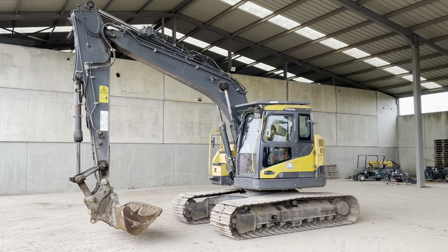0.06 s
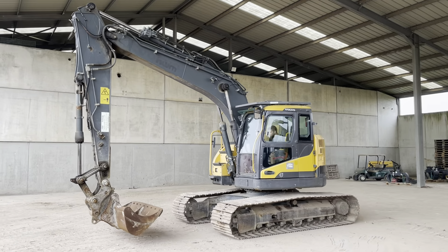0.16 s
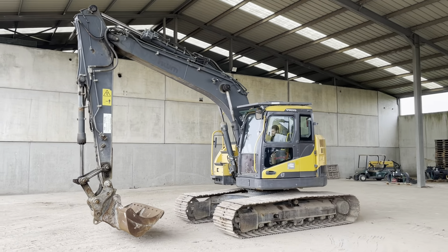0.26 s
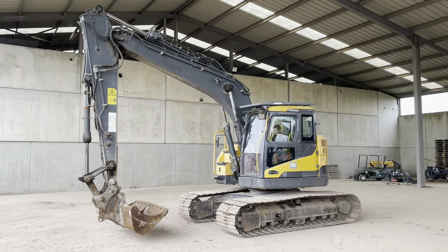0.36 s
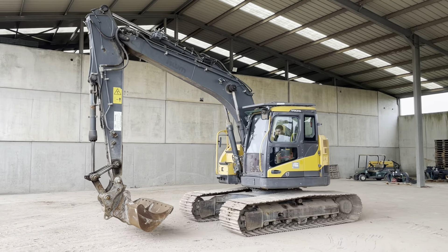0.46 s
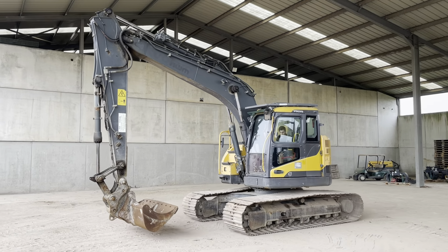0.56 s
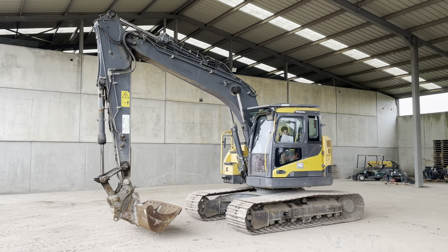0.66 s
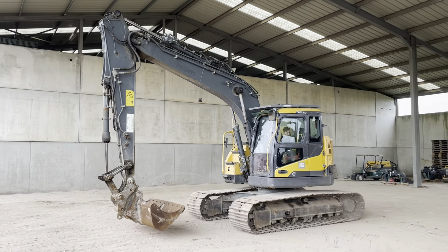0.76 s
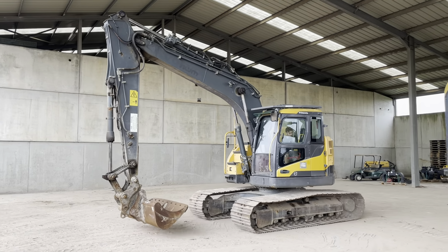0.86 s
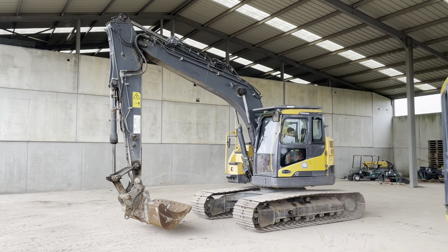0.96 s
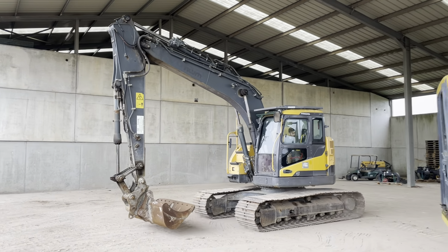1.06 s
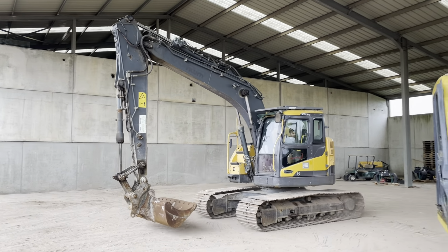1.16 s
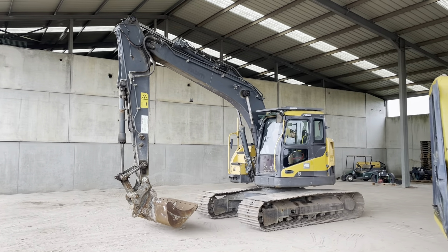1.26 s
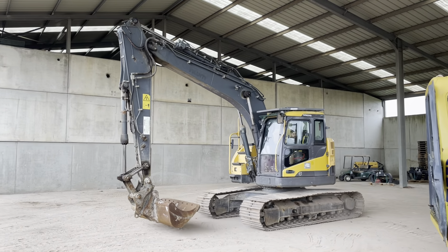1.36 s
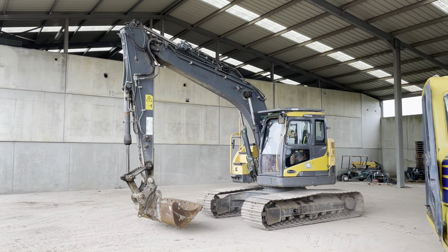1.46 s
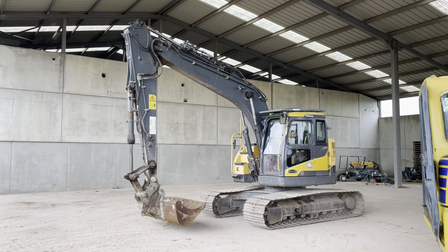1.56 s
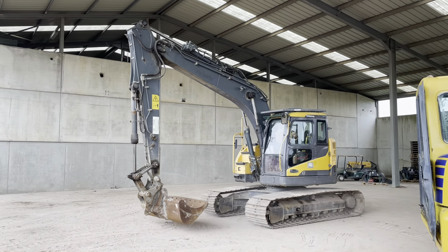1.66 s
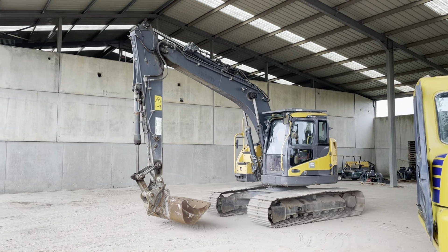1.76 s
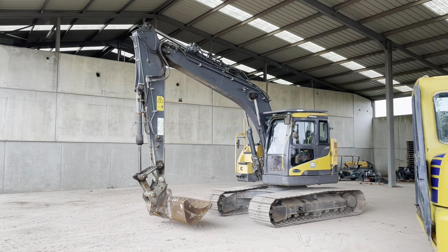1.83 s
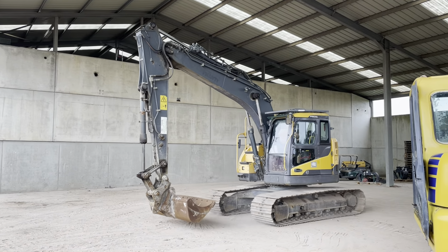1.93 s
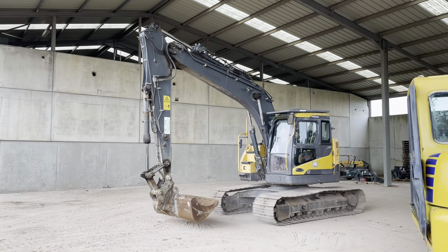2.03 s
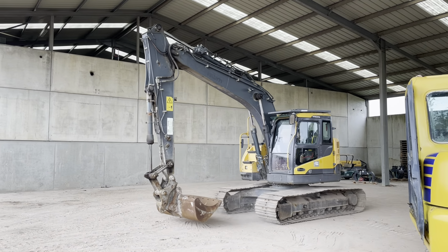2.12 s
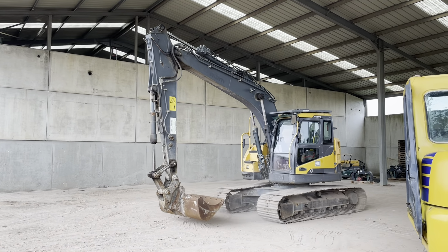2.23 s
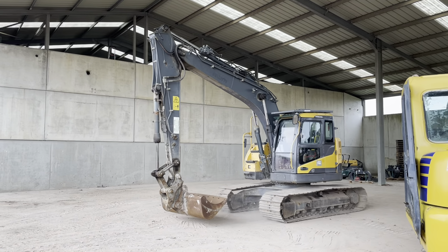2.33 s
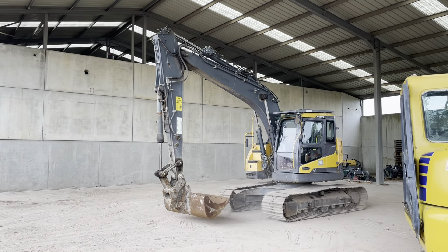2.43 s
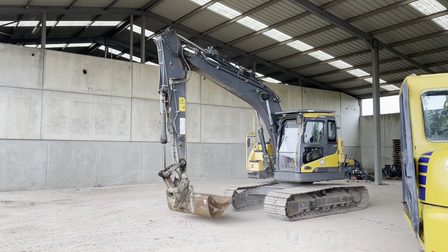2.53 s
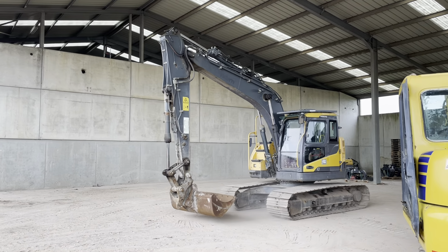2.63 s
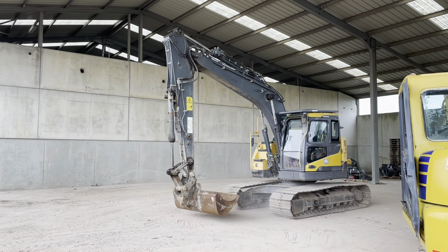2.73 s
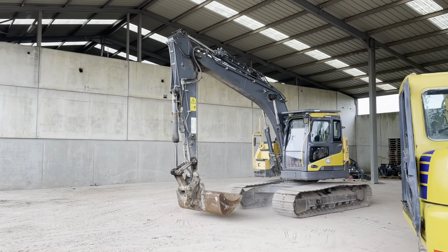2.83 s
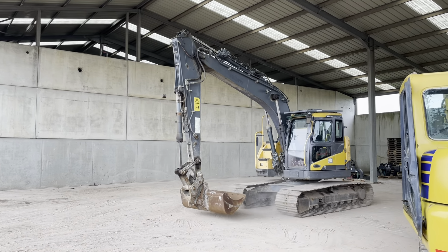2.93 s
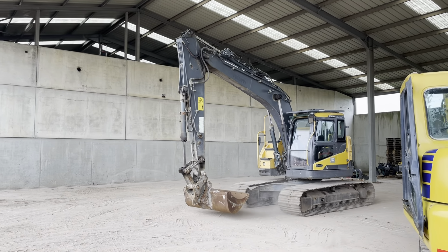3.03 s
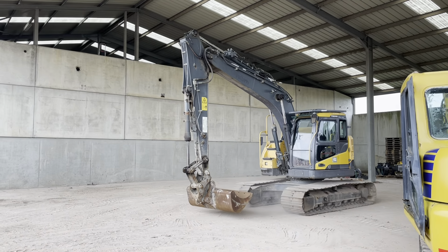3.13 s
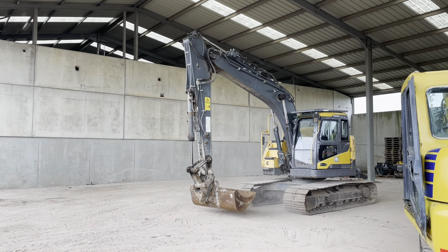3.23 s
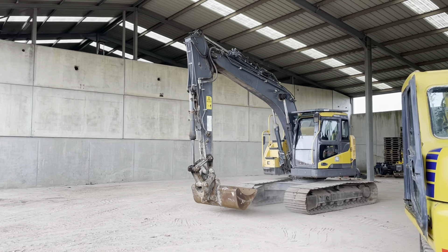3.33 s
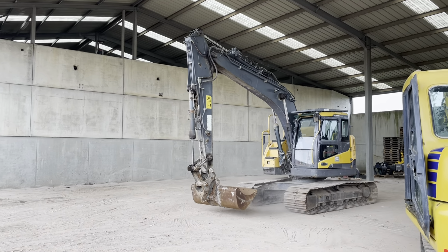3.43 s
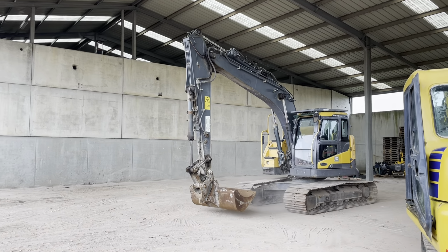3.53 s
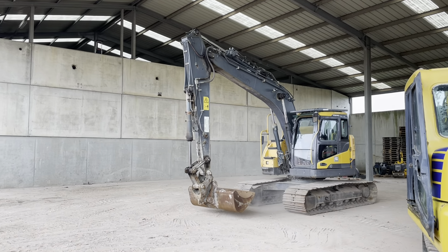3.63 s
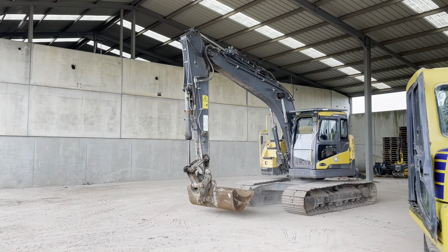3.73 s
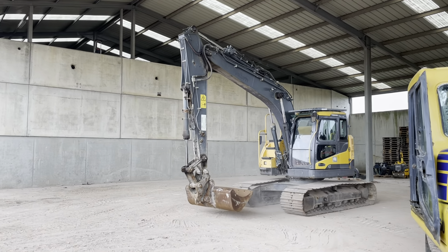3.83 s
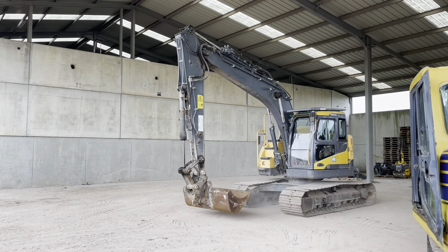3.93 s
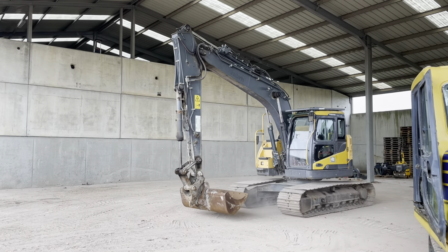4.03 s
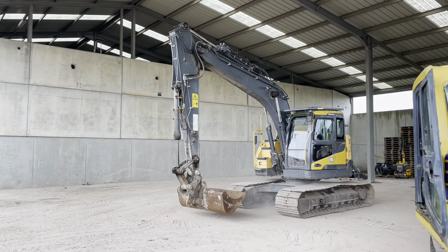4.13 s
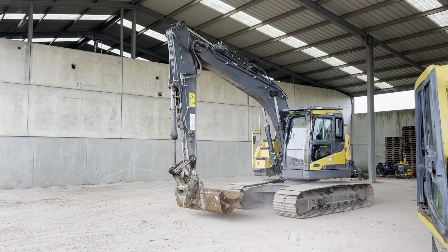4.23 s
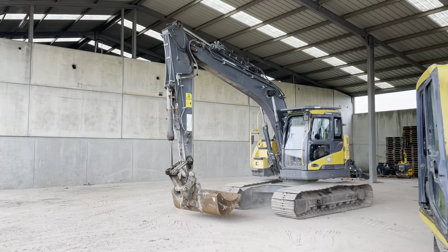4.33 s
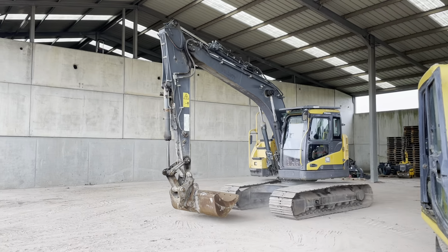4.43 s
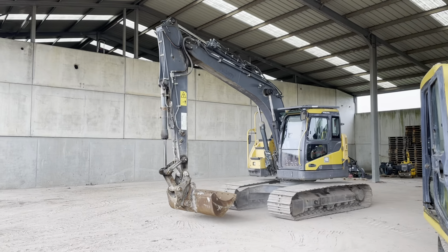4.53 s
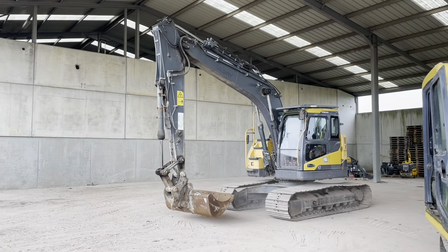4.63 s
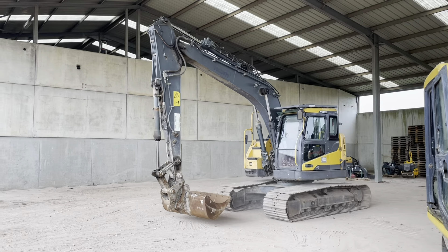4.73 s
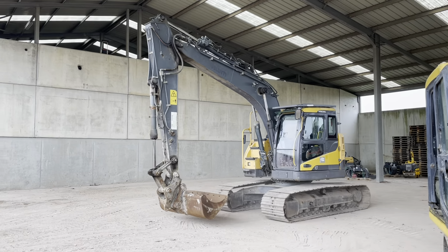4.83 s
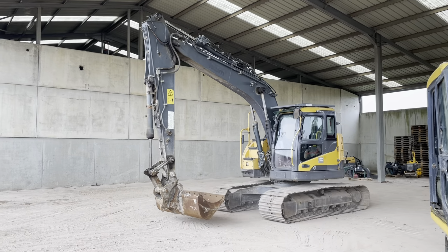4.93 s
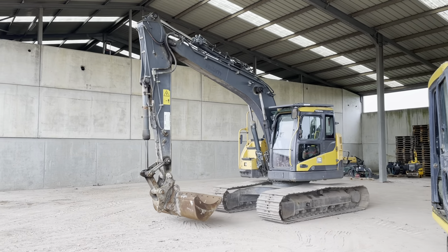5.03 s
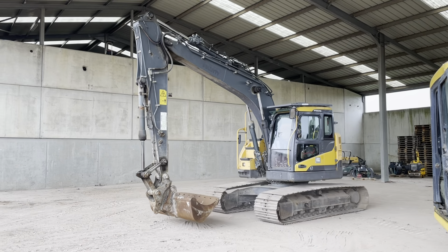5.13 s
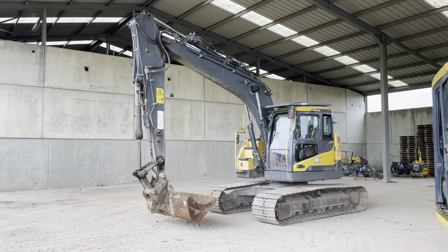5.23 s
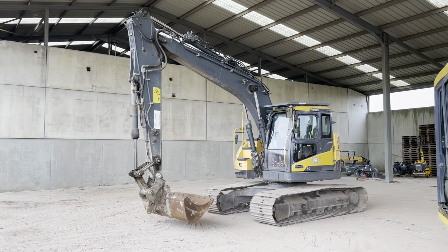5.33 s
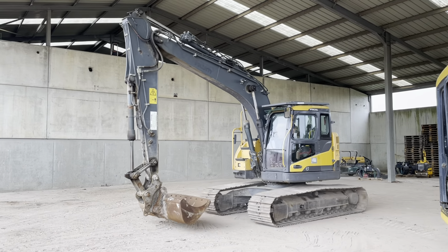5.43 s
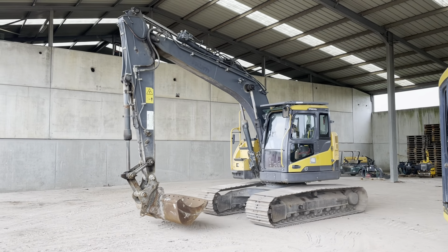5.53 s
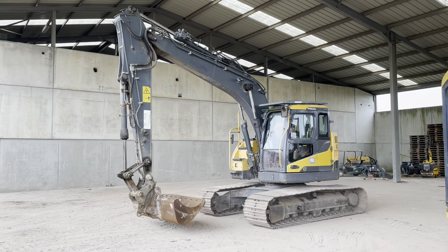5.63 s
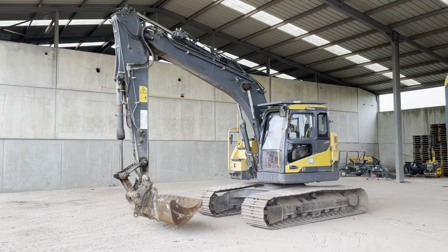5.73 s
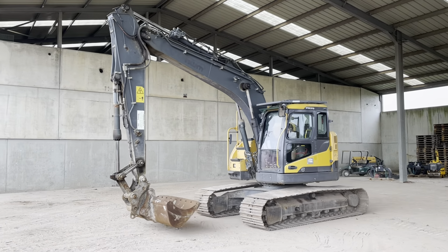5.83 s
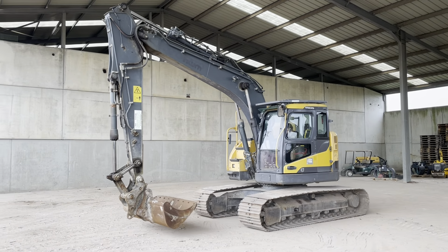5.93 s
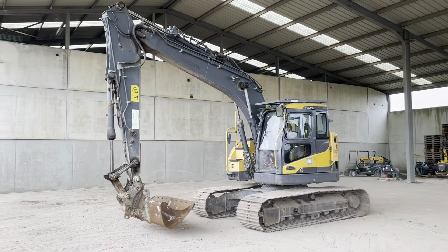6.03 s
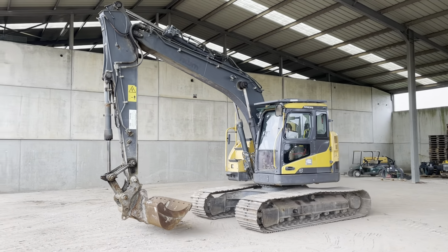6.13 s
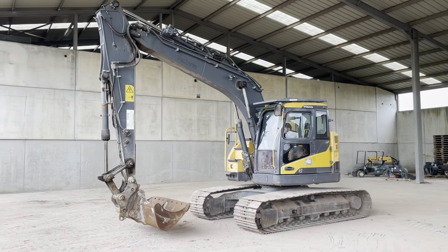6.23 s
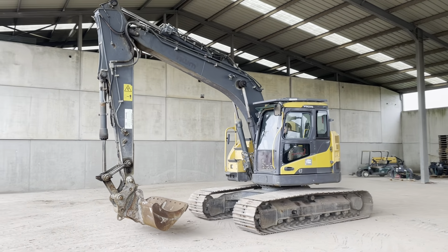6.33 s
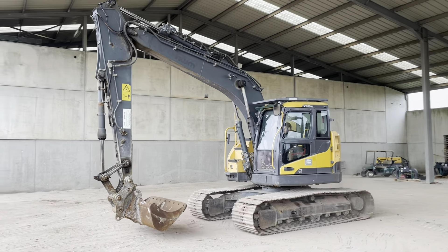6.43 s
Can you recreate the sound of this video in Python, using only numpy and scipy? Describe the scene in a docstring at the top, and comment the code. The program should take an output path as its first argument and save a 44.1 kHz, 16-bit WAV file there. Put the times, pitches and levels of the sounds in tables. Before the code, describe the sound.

Inside a large, bright-ringing shed, an excavator rolls on steel tracks. A steady low diesel and droning travel motors lie under dense metallic clatter, dull shoe slaps, crackling sand and short high pin squeals. Past the middle the clatter sinks almost away, leaving the engine and thin fading squeaks, then returns with a higher motor drone and more squeals. Close stereo microphones, squeals slightly left.

```python
"""In a large shed with a dusty concrete floor a tracked excavator rolls along, slows almost to a halt and moves off again.
The diesel runs steadily as crank tones and pulsing noise; travel motors drone, and the frame booms and groans as noisy notes.
Steel shoes clatter and slap as struck bursts rung through their modes; sand and stones crack as random grains.
Dry track pins squeal as fluttering tones, and decaying noise tails make the shed ring on.
Left and right are two close microphone ports, alike in the bass and the high treble, least alike near 3 kHz."""
import sys
import numpy as np
from scipy import signal
from scipy.fft import rfft, irfft, next_fast_len
from scipy.io import wavfile
from scipy.ndimage import map_coordinates

SR = 44100
rng = np.random.default_rng(int(sys.argv[2]) if len(sys.argv) > 2 else 0)


def wav_out(sig):
    """Save sig, one row per channel (or a flat mono array), as 16-bit PCM at SR to the path in sys.argv[1]."""
    wavfile.write(sys.argv[1], SR, np.round(np.clip(np.atleast_2d(sig).T, -1, 1) * 32767).astype(np.int16))


N = 285327

# The shed's decay: [f/Hz, t60/s]
SHED_DECAY = [(100, 0.44), (1000, 1.8), (2800, 1.5), (5000, 1.37), (11000, 0.79)]
# Likeness of the two ports: [f/Hz, left-right correlation]
PORT_LIKENESS = [(40, .995), (100, .985), (180, .965), (350, .92), (700, .8), (1400, .6), (2800, .3),
                 (4500, .42), (6500, .65), (8000, .92), (14000, .93)]
# Phase between the ports: [f/Hz, lead of left over right/rad]
PORT_LEAD = [(5500, 0), (6630, -.9), (7670, -2.7), (8870, -3.5), (10800, -5.9), (12800, -6.8),
             (13900, -9.4)]
# How hard the tracks run, 0 dB = full travel: [t/s, level/dB]
TRACK_EFFORT = [(0, -3), (.27, -10), (.75, -2.5), (1.55, -0.5), (1.8, -0.5), (2.55, 0.65), (2.9, -0.6),
                (3.17, -0.5), (3.36, -2.5), (3.52, -9.5), (3.78, -16), (4.22, -2.5), (4.5, -0.5), (4.63, 3),
                (4.95, 2), (5.3, 0), (5.8, 1.5), (6.47, -2.6)]
# The diesel's low tones: [multiple of crank speed, level/dB]
CRANK_ORDERS = [(1, -71), (2, -35.5), (3, -45.5), (4, -38.5), (9, -47), (21, -46)]
# Fan and block noise, relative spectrum: [f/Hz, level/dB per Hz]
BLOCK_SPECTRUM = [(20, -36), (45, 4), (70, 5), (125, -25), (190, -9.5), (300, 0.5), (500, -6.5),
                  (900, -8.5), (1400, -10), (2000, -13.5), (4000, -21), (8000, -38.5)]
# The travel motors, faster after the halt: [t/s, f/Hz]
MOTOR_PITCH = [(0.4, 171), (3.6, 172.8), (4.3, 196.5), (6.47, 205)]
# The motors strain as the machine pulls away: [start t/s, length/s, level/dB]
MOTOR_STRAINS = [(.4, 0.35, -28)]
# The machine's weight rocks onto the frame: [start t/s, length/s, level/dB]
FRAME_LURCHES = [(2.14, 0.051, -28), (2.34, 0.039, -24), (3.35, 0.19, -30), (4.89, 0.29, -24),
                 (5.58, 0.078, -33)]
# The chain is pulled tight: [start t/s, length/s, level/dB]
CHAIN_TUGS = [(2.5, 0.41, -29.5), (4.22, 1, -32.5)]
# A grinding note, before the swell of each link; at first it lies on the travel motors' fourth harmonic, later
# the rollers grind on the chain: [t/s, f/Hz, level at full travel/dB]
GRIND_NOTE = [(0, 656, -39), (.8, 687, -37), (1.4, 740, -40), (2.5, 764, -38), (5.0, 817, -37),
              (5.2, 851, -27), (5.9, 834.7, -30.5), (6.47, 818, -31.5)]
# The tracks roll through sand: [start t/s, length/s, level/dB]
SANDY_PATCHES = [(.42, 0.33, -34), (.92, 0.27, -32.5), (1.28, 0.9, -35.5), (2.58, 0.39, -35),
                 (4.25, 0.15, -33), (4.42, 0.31, -29.5), (4.97, 0.49, -31.5), (5.53, 0.14, -35),
                 (5.79, 0.38, -31), (6.24, .23, -29.5)]
# Sand cracking, relative spectrum: [f/Hz, level/dB per Hz]
SAND_SPECTRUM = [(1000, -36), (2500, 5), (4000, 7.5), (5500, 8), (7000, -0.5), (8500, 0), (10500, 0.5),
                 (13000, -9.5), (15500, -17)]
# Stones ground under a shoe, before the echo: [middle t/s, length/s, level/dB]
STONE_CRUNCHES = [(0.862, 0.15, -33.5), (3.662, 0.015, -48), (3.718, 0.024, -43), (3.975, 0.028, -35),
                  (4.031, 0.022, -37), (5.35, 0.024, -35), (6.05, 0.097, -24), (6.37, .12, -37)]
# Stones cracking, relative spectrum: [f/Hz, level/dB per Hz]
STONE_SPECTRUM = [(1200, 0), (2800, -7), (4100, 4), (6000, -12), (7500, -4), (12000, -21)]
# The frame that carries the shoes, relative spectrum: [f/Hz, level/dB per Hz]
FRAME_SPECTRUM = [(20, -31), (40, -12), (60, -13.5), (95, -2.5), (150, -3.5), (200, -1.5), (290, -10),
                  (600, -18.5), (2000, -80)]
# The clack of the shoes, relative spectrum: [f/Hz, level/dB per Hz]
CLACK_SPECTRUM = [(120, -21), (260, -5.5), (390, -5.5), (560, -5), (800, -3.5), (1130, -6), (1500, -4.5),
                  (1900, -11), (2280, -7), (2700, -29.5), (4200, -33), (6000, -29), (8000, -35),
                  (14000, -59)]
# The modes of a shoe: [f/Hz, width/Hz, relative level/dB]
SHOE_MODES = [(388, 89, -0.5), (1384, 83, -2.5), (2280, 25, -2), (2635, 32, -6), (2853, 130, 2.5),
              (3240, 34, 1.5), (3423, 33, 1.5), (3686, 42, -2), (4046, 41, 0), (4405, 45, -2),
              (4930, 50, -5)]
# Heavy shoes dropping on the floor: [t/s, relative level/dB, f of the ring/Hz, rise time constant/ms]
SHOE_DROPS = [(0.59, -14, 645, 17), (0.70, -18, 690, 17), (0.8, -14, 703, 15), (1.04, -18.5, 819, 4),
              (1.188, -13, 836, 13), (1.335, -12.5, 817, 10), (1.612, -11, 790, 10), (1.66, -12, 1430, 12),
              (1.736, -7, 704, 18), (1.782, -16, 1414, 2.1), (1.855, -17, 719, 15), (1.889, -13, 406, 5),
              (1.99, -11, 1480, 8.5), (2.028, -10, 833, 12), (2.132, -7, 843, 19), (2.185, -10, 700, 14),
              (2.258, -3, 391, 29), (2.38, -9, 1400, 14), (2.455, -10.5, 782, 8.5), (2.538, -11, 785, 11),
              (2.572, -10, 643, 9), (2.686, -7, 397, 20), (2.84, -6.5, 804, 19), (2.92, -15, 1404, 19),
              (2.982, -9, 420, 10), (3.11, -9, 1440, 13.6), (3.15, -12, 382, 5.1), (3.296, -8, 708, 19),
              (3.915, -17.5, 803, 17), (4.074, -11.5, 792, 19), (4.142, -19, 843, 3),
              (4.239, -9.5, 750, 18), (4.31, -15.5, 823, 6.9), (4.42, -11, 825, 14),
              (4.587, -6.5, 1590, 5.9), (4.638, -15, 880, 7.5), (4.72, -12, 1383, 7),
              (4.875, -12, 893, 7.4), (4.962, -14, 623, 6), (5.16, -10.5, 823, 6.9), (5.212, -10, 1406, 12),
              (5.285, -9.5, 843, 8.4), (5.436, -15.5, 820, 8), (5.59, -11, 786, 10),
              (5.78, -11.5, 805, 9.7), (5.975, -13, 1455, 12), (6.064, -9, 824, 9.5),
              (6.217, -8.5, 871, 13), (6.35, -11.5, 790, 11)]
# Dry pins slipping, from rough mid-pitched creaks to thin high squeals:
# [start t/s, length/s, f/Hz, relative level/dB, shed send/dB, scale of the pitch flutter/Hz]
PIN_SQUEALS = [(0.0, 0.085, 5460, -44, -2, 13), (0.645, 0.067, 1580, -31, -4, 17),
               (0.774, 0.089, 2207, -29, 1, 9.7), (0.775, 0.051, 2880, -31, -1, 33),
               (.82, 0.13, 2784, -40, 3, 17), (0.828, 0.043, 4440, -32, -4, 14),
               (0.822, 0.073, 3570, -38, -1, 15), (0.847, 0.084, 1348, -27, -2, 10),
               (1.04, 0.15, 1550, -27.5, -5, 11.5), (1.05, .15, 3570, -42.5, 1.5, 16.5),
               (1.209, 0.064, 2287, -28, -5, 6.4), (1.266, 0.054, 2285, -20, -6.5, 6.1),
               (1.321, 0.037, 2285, -25, -9, 6.5), (1.24, 0.086, 4405, -28, -10, 8),
               (1.362, 0.1, 5538, -25, -0.5, 17.8), (1.449, 0.09, 2266, -26.5, -4.5, 8.2),
               (1.55, 0.072, 5470, -30.5, 2.5, 13), (1.625, 0.058, 4990, -23.5, -5, 13),
               (1.757, 0.046, 5560, -34, -3, 10), (1.82, 0.047, 5480, -34, 1, 15),
               (1.792, .09, 10280, -46, 2, 29), (2.1, 0.045, 5560, -38, -10, 14),
               (1.36, .1, 11000, -46, 2, 46), (1.901, 0.057, 2600, -34, -2, 14),
               (2.608, 0.067, 4360, -20, -4, 9.1), (2.621, 0.11, 11100, -49, 7, 35),
               (2.73, 0.13, 4370, -30.5, 1.5, 12), (2.72, 0.081, 10800, -40, -5, 43),
               (2.952, 0.11, 5040, -40, -1, 10), (3.14, 0.081, 4330, -31, -8, 27),
               (3.2, 0.042, 5860, -28, -6, 12), (3.297, 0.056, 2747, -23.5, 3, 9.7),
               (3.343, 0.033, 2763, -14.5, -5.5, 14), (3.382, 0.052, 2753, -16, -4.5, 10),
               (3.304, 0.15, 5486, -32, -1, 20), (3.335, 0.048, 7980, -40, 8, 21),
               (3.519, 0.19, 2781, -31, 1.5, 6.1), (3.68, 0.15, 2766, -36, -1, 7.4),
               (3.819, 0.24, 2762, -36.5, -13, 7), (3.85, 0.097, 4250, -31, -4, 4.4),
               (3.928, 0.041, 4290, -27.5, -5, 26), (3.96, 0.058, 4250, -33, -7, 13),
               (3.955, 0.045, 4080, -37, -4, 30), (4.305, 0.037, 4460, -28, -11, 22),
               (4.38, 0.1, 5950, -37, 1, 20), (4.395, 0.053, 3670, -31, -8, 11),
               (4.477, 0.13, 5153, -30, -2.5, 19), (4.497, 0.17, 3230, -39, -1, 9.6),
               (4.578, 0.075, 4380, -26, -7, 5.4), (4.587, .04, 6640, -34, -6, 20),
               (4.713, 0.043, 4440, -22, 0.5, 10.5), (4.749, 0.038, 4422, -16, -7, 18),
               (4.786, 0.02, 4394, -24, -9, 12), (4.842, 0.031, 4420, -20, -11, 9.5),
               (4.925, 0.13, 4390, -34.5, 3.5, 13.6), (5.15, 0.13, 4400, -38.5, -12, 13),
               (4.52, .035, 2200, -26.5, -9, 20), (5.355, 0.039, 2830, -30, -7, 14),
               (5.069, 0.033, 4160, -29, -8, 29), (5.224, 0.064, 3396, -30.5, -3, 9),
               (5.312, 0.038, 5080, -19.5, -5.5, 14), (5.45, 0.12, 5170, -38, -2, 10),
               (5.58, 0.06, 5104, -20, -4.5, 13), (5.836, 0.12, 5094, -28.5, 0.5, 16.2),
               (5.895, 0.087, 3580, -30.5, -9, 17), (5.998, 0.098, 4350, -25.5, -8, 13),
               (6.27, 0.12, 4340, -31.5, -1, 13.6), (6.395, 0.035, 4365, -24, -5, 10),
               (6.32, 0.065, 5990, -36, -1, 28), (6.405, 0.079, 5076, -27, -3, 12)]

# Levels at full travel; each "grows" is dB gained per dB of effort
DRIVE_DB, DRIVE_GROWS = -37.5, 1
BOOM_DB, BOOM_GROWS = -38, 1
GRIND_GROWS = 1
SAND_DB, SAND_GROWS = -42.5, 0.6
RUMBLE_DB, RUMBLE_GROWS = -25.5, 0.66
CLATTER_DB = -22.5
SQUEAK_DB = -38  # loudest faint squeak, relative like the squeals

CRANK_HZ = 32.46
BOOM_HZ, GROAN_HZ = 95.4, 405.6
LINK_RATE = 7.1  # mean number of links passing a roller each second
GRIND_PULSE = 0.77  # depth of the grinding swell with each link
LOAD_ATTACK_S, LOAD_RELEASE_S = 0.035, 0.1  # linear rise; time constant of the fade
SAND_ATTACK_S = 0.12  # the tracks roll into a patch gradually
STONE_CRACKS_PER_S, STONE_ECHO_DB = 1400, -2
KNOCK_LOW_HZ, KNOCK_OCTAVES = 300.3, 2.6  # pitch range of a knock, by where the shoe is struck
PIN_CATCH_S, PIN_RELEASE_S = 0.011, 0.016  # a squeal catches a little faster than it lets go
OCTAVE_DB = -19  # overtone of a squeal, relative to its note
SQUEAK_FLUTTER_HZ = 33.8  # scale of the pitch flutter
SQUEAL_LEFT_DB, ECHO_LEFT_DB = 4, 3  # left over right
TOP_HZ = 15900


def amp(db):
    """Decibels to gain."""
    return 10 ** (np.asarray(db) / 20)


def unit(x):
    """Scale to rms 1."""
    return x / np.sqrt(np.mean(x ** 2) + 1e-20)


def along(points, hz):
    """Read (Hz, value) points on a log frequency axis."""
    f, v = np.transpose(points)
    return np.interp(np.log(hz + 1), np.log(f + 1), v)


def curves(rows):
    """One value per sample for each column after the time."""
    s, *columns = np.transpose(rows)
    return [np.interp(np.arange(N) / SR, s, column) for column in columns]


def wobble(rate):
    """A smooth random curve with rate knots a second."""
    knots = rng.standard_normal(int(N * rate / SR) + 4)
    return map_coordinates(knots, [np.arange(N) * rate / SR])


def filtered(x, response):
    """Filter x by a response given as a function of frequency."""
    size = next_fast_len(N + SR // 2)
    spectrum = rfft(x, size) * response(np.fft.rfftfreq(size, 1 / SR))
    return irfft(spectrum, size)[..., :N]


def coloured(x, spectrum):
    """Shape x by a spectrum and scale it to rms 1."""
    return unit(filtered(x, lambda hz: amp(along(spectrum, hz))))


def add(track, s, sound):
    """Mix a sound into a track from time s on."""
    start = int(np.clip(round(s * SR), 0, N - 1))
    track[..., start:start + sound.shape[-1]] += sound[..., :N - start]


def contacts(rate, spread_db):
    """Random impulses of scattered size, on average rate a second."""
    hits = rng.random(N) < rate / SR
    return hits * amp(spread_db * np.clip(rng.standard_normal(N), -2, 1))


def effort(db, grows=1):
    """Gain of a layer that follows the effort of the tracks."""
    return amp(db + grows * curves(TRACK_EFFORT)[0])


def loads(rows, attack_s):
    """Gain of passing loads: each rises, holds and dies away exponentially."""
    t = np.arange(N) / SR
    gain = np.zeros(N)
    for s, length, db in rows:
        rise = np.clip((t - s) / attack_s, 0, 1)
        fall = np.exp(-np.maximum(t - s - length, 0) / LOAD_RELEASE_S)
        gain += amp(db) * rise * fall
    return gain


def shed(x, count=16):
    """Diffuse ringing on two unrelated paths, renewed in stretches as the machine moves; treble dies sooner."""
    x, wet = np.atleast_2d(x), np.zeros((2, N))
    hz, t = np.fft.rfftfreq(256, 1 / SR), np.arange(450) * 128 / SR
    fade = amp(-60 * t / along(SHED_DECAY, hz)[:, None])
    for part in np.array_split(np.arange(N), count):
        phases = np.exp(2j * np.pi * rng.random((2, *fade.shape)))
        tail = signal.istft(fade * phases, SR)[1]
        tail = tail / np.linalg.norm(tail[0])
        add(wet, part[0] / SR, signal.fftconvolve(x[:, part], tail, axes=1))
    return wet


def ports(pair):
    """Blend two unrelated signals into left and right with the likeness of the two ports."""
    def weights(hz):
        turn = np.arccos(np.clip(along(PORT_LIKENESS, hz), -1, 1)) / 2
        return np.array([np.cos(turn), np.sin(turn)])

    mid, side = filtered(pair, weights)
    return np.array([mid + side, mid - side])


def resonance(hz, width_hz):
    """A rough, hollow note: slow noise, half strength at width_hz, carried up to a pitch given per sample."""
    rub = unit(filtered(rng.standard_normal((2, 2, N)), lambda f: 1 / (1 + (f / width_hz) ** 4)))
    phase = 2 * np.pi * np.cumsum(hz) / SR
    return ports(rub[0] * np.cos(phase) + rub[1] * np.sin(phase))


def engine():
    """A four-cylinder diesel: wavering crank orders, and noise that pulses once and twice a crank turn."""
    crank = 2 * np.pi * np.cumsum(CRANK_HZ * (1 + 0.0046 * wobble(3))) / SR
    tones = np.zeros(N)
    for k, db in CRANK_ORDERS:
        level = amp(db + 1.3 * wobble(4)) * np.sqrt(2)
        tones += level * np.sin(k * crank + 2 * np.pi * rng.random())
    beat = 1 + 0.09 * np.cos(2 * crank) + 0.2 * np.cos(crank)
    block = coloured(beat * rng.standard_normal((2, N)), BLOCK_SPECTRUM)
    return tones + amp(-32.0) * ports(block)


def drive():
    """The travel motors drone as one wavering tone, louder with effort and as they pull away."""
    hz, = curves(MOTOR_PITCH)
    phase = 2 * np.pi * np.cumsum(hz * (1 + 0.004 * wobble(9.9))) / SR
    level = np.hypot(effort(DRIVE_DB, DRIVE_GROWS), loads(MOTOR_STRAINS, LOAD_ATTACK_S))
    return level * amp(1.2 * wobble(5.6)) * np.sin(phase)


def boom():
    """The hollow track frame resonates low, swelling when the machine lurches."""
    level = np.hypot(effort(BOOM_DB, BOOM_GROWS), loads(FRAME_LURCHES, LOAD_ATTACK_S))
    return level * resonance(np.full(N, BOOM_HZ), width_hz=23.0)


def groan():
    """The chain groans near the shoes' lowest mode while it is pulled tight."""
    level = loads(CHAIN_TUGS, LOAD_ATTACK_S) * amp(2.2 * wobble(10))
    return level * resonance(np.full(N, GROAN_HZ), width_hz=49)


def grind(link):
    """Rollers grind along the chain, swelling with each link and fading as the tracks slow."""
    hz, db = curves(GRIND_NOTE)
    swell = 1 + GRIND_PULSE * np.cos(link)
    return effort(db, GRIND_GROWS) * swell * resonance(hz, width_hz=126)


def grit():
    """Sand cracks under the shoes in dense tiny grains; the shed blurs them."""
    crush = np.hypot(effort(SAND_DB, SAND_GROWS), loads(SANDY_PATCHES, SAND_ATTACK_S))
    grains = contacts(8000, spread_db=4) * rng.standard_normal((2, N))
    grains = unit(grains * amp(2 * wobble(70)))
    grains = (grains + amp(-0.5) * shed(grains)) * amp(1.7 * wobble(35))
    return ports(crush * coloured(grains, SAND_SPECTRUM))


def stones():
    """A stone under a shoe gives way in a short run of coarse cracks."""
    press = np.zeros(N)
    for s, length, db in STONE_CRUNCHES:
        add(press, s - length / 2, amp(db) * signal.windows.tukey(int(length * SR), .5))
    impulses = contacts(STONE_CRACKS_PER_S, spread_db=3) * rng.standard_normal((2, N))
    cracks = press * coloured(impulses, STONE_SPECTRUM)
    return ports(cracks + amp(STONE_ECHO_DB) * shed(cracks))


def steel(t60, ring_db, hz, note_db, note_t60):
    """One struck shoe: a short noisy clack, a leading note and a weaker, slower noisy ring."""
    t = np.arange(SR // 6) / SR
    fade = amp(-60 * t / t60) + amp(ring_db - 60 * t / 0.4)
    note = amp(note_db - 60 * t / note_t60) * np.sin(2 * np.pi * (hz * t + rng.random((2, 1))))
    return rng.standard_normal((2, len(t))) * fade + note


def shoes(blows, ring_db):
    """Blows heard through the steel shoes: a broad clack plus the ring of their modes."""
    def modes(f):
        return sum(amp(db) * 1j * f * width / (centre * centre - f * f + 1j * f * width)
                   for centre, width, db in SHOE_MODES)

    return coloured(blows, CLACK_SPECTRUM) + amp(ring_db) * unit(filtered(blows, modes))


def tracks(link):
    """Shoes knock on rollers and sprockets, denser once per link, each at its own pitch; the frame rumbles."""
    sizes = contacts(110 * np.maximum(1 + .45 * np.cos(link), 0), spread_db=0.5)
    knocks = np.zeros((2, N))
    for i in np.flatnonzero(sizes):
        hz = KNOCK_LOW_HZ * 2 ** (KNOCK_OCTAVES * rng.random())
        knock = steel(t60=0.041, ring_db=-13.0, hz=hz, note_db=-7.5, note_t60=0.066)
        add(knocks, i / SR, sizes[i] * knock)
    knocks = knocks + amp(0.5) * shed(knocks)
    clatter = effort(CLATTER_DB) * shoes(knocks, ring_db=-11.5)
    # in the heavy frame the single knocks merge into one roll
    roll = coloured(rng.standard_normal((2, N)), FRAME_SPECTRUM)
    rumble = effort(RUMBLE_DB, RUMBLE_GROWS) * roll
    return ports(clatter + rumble)


def clanks():
    """Whole shoes slap down on the concrete, some sharply and some softly, each with a short note of its own."""
    blows = np.zeros((2, N))
    for s, db, hz, rise_ms in SHOE_DROPS:
        slap = steel(t60=0.2, ring_db=-26.0, hz=hz, note_db=-9, note_t60=0.12)
        rise = 1 - np.exp(-np.arange(slap.shape[1]) / SR / (rise_ms / 1000))
        add(blows, s, amp(db) * slap * rise)
    blows = blows + amp(-7.0) * shed(blows)
    return amp(-26.5) * ports(shoes(blows, ring_db=-16.5))


def cry(length, hz, octave_db, waver):
    """A sticking pin sets a shoe singing; the chattering contact makes strength and pitch flutter."""
    t = np.arange(int(length * SR)) / SR

    def flutter(rate):
        return map_coordinates(rng.standard_normal(256), [t * rate], mode="wrap")

    bend = flutter(42.9) + 2.32 * flutter(396.5)
    phase = 2 * np.pi * np.cumsum(hz * (1 + waver * (bend - bend.mean()))) / SR
    overtone = (2 * hz < TOP_HZ) * amp(octave_db) * np.sin(2 * phase)
    tone = np.sin(phase) + overtone
    grip = amp(2.2 * flutter(110))
    envelope = np.clip(t / PIN_CATCH_S, 0, 1) * np.clip((length - t) / PIN_RELEASE_S, 0, 1)
    return unit(tone * grip) * envelope


def leftward(db):
    """Gains that set left above right by db."""
    return amp([[db / 2], [-db / 2]])


def squeals(count=130):
    """Loud pin squeals over a web of faint rough squeaks near the shoes' modes; the shed rings on after each."""
    direct, sent = np.zeros((2, N)), np.zeros(N)
    for s, length, hz, db, echo_db, flutter_hz in PIN_SQUEALS:
        sound = amp(db) * cry(length, hz, OCTAVE_DB, flutter_hz / hz)
        add(direct, s, sound * leftward(SQUEAL_LEFT_DB))
        add(sent, s, amp(echo_db) * sound)
    # faint squeaks follow the effort of the tracks
    rolling = effort(SQUEAK_DB)
    pitches = [hz for hz, _, _ in SHOE_MODES if 2000 < hz < 6000]
    for when, mode, detune, size in rng.random((count, 4)):
        hz = pitches[int(mode * len(pitches))] * (.98 + .04 * detune)
        level = rolling[int(when * N)] * amp(-5 * size)
        sound = level * cry(.07, hz, octave_db=-20, waver=SQUEAK_FLUTTER_HZ / hz)
        add(direct, when * N / SR, sound)
        add(sent, when * N / SR, amp(-10) * sound)
    echo = ports(shed(sent)) * leftward(ECHO_LEFT_DB)
    return amp(-2.0) * direct + echo


def scene():
    """The whole machine in the shed; high treble reaches the two ports out of step."""
    link = 2 * np.pi * np.cumsum(LINK_RATE * (1 + .04 * wobble(2))) / SR
    machine = engine() + drive()
    undercarriage = boom() + groan() + grind(link) + tracks(link) + clanks()
    mix = machine + undercarriage + grit() + stones() + squeals()
    # half the phase lead goes to each side
    sides = np.array([[1], [-1]])
    return filtered(mix, lambda hz: np.exp(.5j * along(PORT_LEAD, hz) * sides))


def record(dry):
    """A band limit that keeps nothing from TOP_HZ up."""
    return filtered(dry, lambda hz: hz < TOP_HZ)


dry = scene()
out = record(dry)
wav_out(out)
```